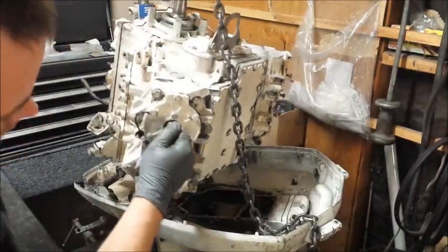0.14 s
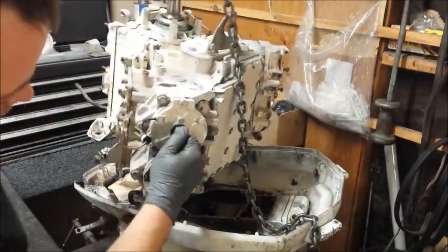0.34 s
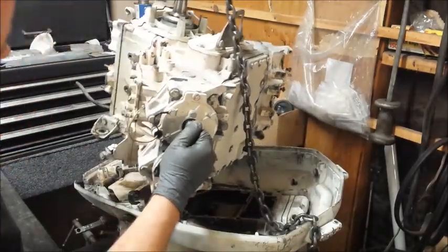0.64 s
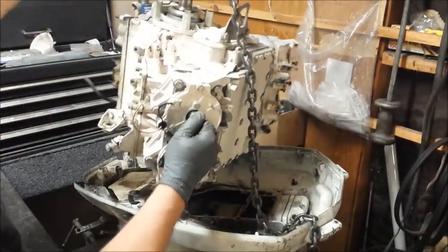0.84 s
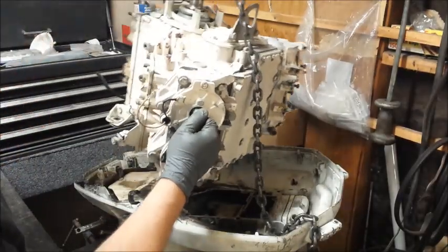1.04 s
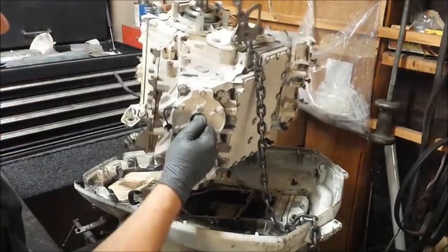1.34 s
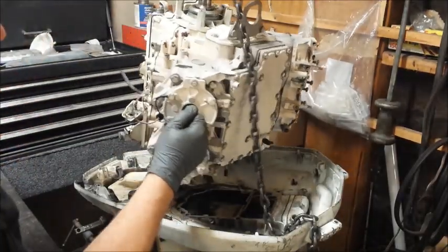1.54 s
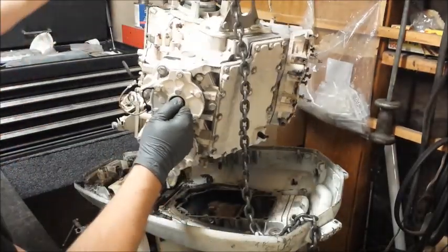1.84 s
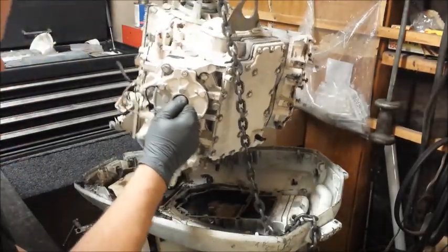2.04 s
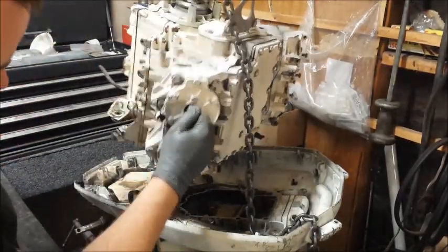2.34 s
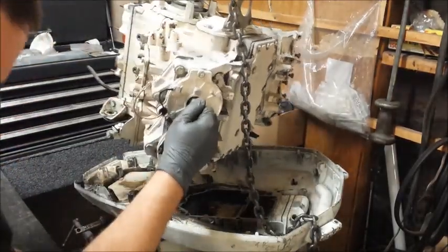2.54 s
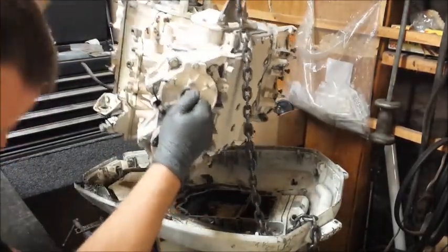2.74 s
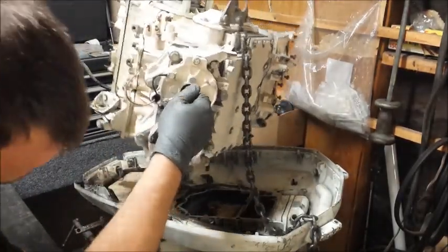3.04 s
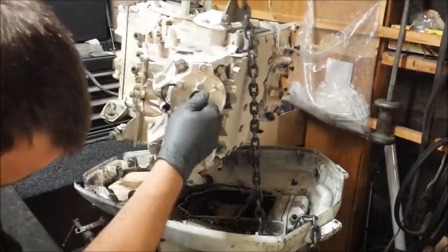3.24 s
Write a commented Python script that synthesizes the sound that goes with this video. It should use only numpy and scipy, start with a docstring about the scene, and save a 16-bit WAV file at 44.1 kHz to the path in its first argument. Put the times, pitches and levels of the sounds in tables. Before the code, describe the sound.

A chain hoist ratchets with irregular metallic clicks, clinking links and low thuds in a garage.

```python
"""Lever chain hoist in a small garage

An engine is lifted at about one stroke a second. Each turn of the lever forces the support into
a low thud. On the pull, impacts excite steel modes: the pawl pings and loaded links snap into place.
On the way back the ratchet rattles more softly. Reflections from the walls add a short tail."""
import sys
import numpy as np
from scipy import signal
from scipy.io import wavfile
from scipy.ndimage import uniform_filter1d

SR = 44100
rng = np.random.default_rng(int(sys.argv[2]) if len(sys.argv) > 2 else 0)


def dump(signal):
    """Clip the signal to [-1, 1] and save it as 16-bit WAV at the path in sys.argv[1]."""
    limited = np.clip(np.atleast_2d(signal).T, -1, 1)
    pcm = np.round(limited * 32767).astype(np.int16)
    wavfile.write(sys.argv[1], SR, pcm)


N = 149940
EVENT_S = .4  # time allowed for one impact

# spectrum of a hard steel contact: frequency_hz, level_db
SNAP_SPECTRUM = [(200, -19.5), (600, -15.5), (1300, -9), (1900, -14.5), (2700, -5.5), (3700, -8), (5400, 3),
                 (7700, -5), (10000, -13), (15500, -13)]
# spectrum of loose steel rattling: frequency_hz, level_db
RATTLE_SPECTRUM = [(200, 2), (600, -5.5), (1500, -5), (2000, -8), (2600, -1), (3800, -2.5), (6000, 0),
                   (8000, -11), (10000, -15), (15500, -17)]


def amp(db):
    """Amplitude ratio of a level in decibels."""
    return 10 ** (np.asarray(db) / 20)


def unit(x):
    """Normalisation to unit energy."""
    return x / np.sqrt(np.sum(x ** 2) + 1e-20)


def read(points, hz):
    """Interpolation on a log-frequency axis."""
    f, value = np.transpose(points)
    return np.interp(np.log(hz + 1), np.log(f + 1), value)


def add(mix, start_s, sound):
    """Superposition of a delayed sound on the mix."""
    part = mix[max(round(start_s * SR), 0):][:len(sound)]
    part += sound[:len(part)]


def colour(x, points, tilt_db=0, size=4096):
    """Minimum-phase filter with the given spectrum, tilted by tilt_db per octave."""
    hz = abs(np.fft.fftfreq(size, 1 / SR))
    octaves = np.log2(np.maximum(hz, points[0][0]) / points[0][0])
    log_gain = np.log(amp(read(points, hz) + tilt_db * octaves))
    taps = np.fft.ifft(np.exp(np.conj(signal.hilbert(log_gain)))).real[:size // 2]
    return signal.fftconvolve(x, taps)[:len(x)]


def ring(modes):
    """Free vibration: a sum of damped modes in random phase."""
    t = np.arange(0, EVENT_S, 1 / SR)
    return sum(amp(db) * np.exp(-np.log(1000) * t / t60) * np.sin(2 * np.pi * (hz * t + rng.random()))
               for hz, db, t60 in modes)


def jangle(low_hz, high_hz, t60, count=40):
    """Inharmonic vibration of loose steel parts: modes scattered in log frequency."""
    draws = rng.random((count, 2))
    return unit(ring([(low_hz * (high_hz / low_hz) ** place, 20 * np.log10(size + 1e-9), t60)
                      for place, size in draws]))


def clash(crack_s, chatter_s, chatter_db, grain_db):
    """Impact noise of steel on steel: a crack and a decaying chatter of tiny contacts."""
    t = np.arange(0, EVENT_S, 1 / SR)
    crack, chatter, sizes = rng.standard_normal((3, len(t)))
    clumps = unit(uniform_filter1d(sizes, size=40)) * np.sqrt(len(t))
    crack = unit(crack * np.exp(-t / crack_s))
    chatter = unit(chatter * amp(grain_db * clumps) * np.exp(-t / chatter_s))
    return unit(crack + amp(chatter_db) * chatter)


def air(level_db=-45):
    """Stationary background noise, strongest in the bass."""
    # garage background: frequency_hz, level_db
    spectrum = [(20, 5), (40, -0.5), (110, 5.5), (300, -1), (700, -5.5), (1200, -11), (2600, -15),
                (3800, -38), (5800, -13), (9000, -27), (15000, -28.5)]
    return amp(level_db) * np.sqrt(N) * unit(colour(rng.standard_normal(N), spectrum))


def garage(x, delay_s=0.0071, build_s=0.0045):
    """Diffuse reverberation: dense reflections, each band decaying at its own rate."""
    # reverberation time: frequency_hz, t60_s
    decay = [(100, 0.39), (500, 1), (1500, 0.5), (3500, 0.4), (6000, 0.33), (10000, 0.22), (15000, 0.39)]
    hz, t, bands = signal.stft(rng.standard_normal(SR), SR, nperseg=256)
    damping = np.exp(-np.log(1000) * t / read(decay, hz)[:, None])
    tail = signal.istft(bands * damping, SR, nperseg=256)[1]
    onset = np.clip((np.arange(len(tail)) / SR - delay_s) / build_s, 0, 1)
    return signal.fftconvolve(x, unit(tail * onset))[:N]


def loose_chain(ticks_per_s=160, level_db=-52):
    """Shot noise: random contacts in the hanging chain merge into a faint rustle."""
    impulses = (rng.random(N) < ticks_per_s / SR) * rng.standard_normal(N)
    tick = colour(jangle(low_hz=889, high_hz=6700, t60=0.044), RATTLE_SPECTRUM)
    return amp(level_db) * np.sqrt(N) * unit(signal.fftconvolve(impulses, tick)[:N])


def jingle():
    """High modes of the free chain, excited in a new balance by every blow."""
    # chain overtones: frequency_hz, level_db, t60_s
    overtones = [(7870, 12, 0.099), (8100, -18, 0.12), (9700, -22, 0.09), (9500, -1, 0.14),
                 (10800, -4, 0.073), (11500, -7, .09), (14400, -19, .1)]
    return unit(ring([(hz * rng.uniform(.985, 1.015), db + 4 * rng.standard_normal(), t60)
                      for hz, db, t60 in overtones]))


def support(attack_s=0.0049, release_s=0.023, sag_db_per_s=25, thump_t60=0.091, wander=0.145):
    """Forced vibration: the overhead support thumps, booms and judders as it takes the load."""
    # lever turns: start_s, length_s, level_db, tilt_db_per_octave, boom_hz, boom_db, thump_db
    shudders = [(0.143, 0.08, -2.5, 1, 106, -3, -4), (0.232, 0.081, -2, -1, 99.3, 0, -17),
                (0.608, 0.024, -3.5, -1, 138, -21, -4), (1.065, 0.017, -9.5, -3.5, 93.6, 0.5, -14),
                (1.143, 0.19, -10.5, -1, 92.2, 0, -10), (1.552, 0.031, -5, 1.5, 236.3, -7, -1),
                (2.055, 0.1, -6.5, 3, 111.5, -3.5, -2.5), (2.142, 0.11, -5.5, 1, 104, -4, -11),
                (2.554, 0.013, -5, -2, 148, -7, -1.5), (2.583, 0.012, -11, 0, 140.3, -9, 6.5),
                (3.037, 0.092, -5.5, 2.5, 100, 0, -4), (3.243, 0.0045, -10, -4, 105, -4, -0.5)]
    # support resonances: frequency_hz, level_db, t60_s
    modes = [(96.7, 1, 0.72), (138, -14, 0.17), (145.7, -5, 0.3), (191, 1, 0.13), (224.7, -16, 0.85),
             (298.6, -0.5, 0.3), (393, -3, 0.128), (446, -11.5, 0.36)]
    # broadband response of the support: frequency_hz, level_db
    spectrum = [(30, -7), (65, -40), (95, -4.5), (115, -3), (150, 4), (180, -5.5), (255, -4), (330, -17.5),
                (550, -26), (1200, -22.5), (4000, -49.5)]
    out, t = np.zeros(N), np.arange(0, EVENT_S, 1 / SR)
    onset = np.minimum(t / attack_s, 1)
    for start_s, length_s, db, tilt_db, boom_hz, boom_db, thump_db in shudders:
        push = onset * amp(-sag_db_per_s * t) * np.exp(-np.maximum(t - length_s, 0) / release_s)
        force = unit(push * rng.standard_normal(len(t)))
        tilted = [(hz, level + tilt_db * np.log2(hz / modes[0][0]), t60) for hz, level, t60 in modes]
        resonance = unit(signal.fftconvolve(force, unit(ring(tilted)))[:len(t)])
        judder = unit(unit(colour(force, spectrum, tilt_db)) + amp(-6) * resonance)
        drift = unit(uniform_filter1d(rng.standard_normal(len(t)), size=600)) * np.sqrt(len(t))
        phase = 2 * np.pi * np.cumsum(boom_hz * (1 + wander * drift)) / SR
        boom = unit(push * (np.sin(phase) + amp(-6) * np.sin(2 * phase)))
        thump = unit(onset * np.exp(-np.log(1000) * t / thump_t60) * np.sin(2 * np.pi * boom_hz * t))
        gain = amp(db - 31.5) * np.sqrt((length_s + release_s) * SR)  # energy grows with duration
        add(out, start_s, gain * (unit(judder + amp(boom_db) * boom) + amp(thump_db) * thump))
    return out


def housing(spread=1.4):
    """Body resonance: the hoist housing rings with a hollow clank under two ratchet clicks."""
    # housing clanks: start_s, level_db, centre_hz
    clanks = [(1.833, -1.5, 1382), (2.832, -5.5, 956)]
    out = np.zeros(N)
    for start_s, db, hz in clanks:
        add(out, start_s, amp(db) * jangle(hz / spread, hz * spread, t60=0.14, count=16))
    return out


def slack(attack_s=0.0016):
    """Backlash: the play in lever and chain closes with small, dull knocks."""
    # muffled contacts: start_s, level_db, centre_hz
    knocks = [(.133, 2.5, 2600), (0.145, -10, 1300), (0.172, -1, 1980), (.2, -3.5, 1270),
              (2.0476, -0.5, 6100), (2.059, -1.5, 1430), (2.0926, 1, 6150), (2.405, -4, 2290),
              (2.546, 3.5, 2290), (3.027, 0, 5700), (3.075, -5.5, 6540), (3.167, -11, 5670),
              (3.294, -4, 4660), (3.359, -9.5, 5700)]
    # spectrum of a knock: ratio_to_centre, level_db
    shape = [(.1, -8.5), (.55, -5.5), (1, 1), (1.3, -10), (2.2, -18.5), (6, -37)]
    out = np.zeros(N)
    for start_s, db, centre_hz in knocks:
        strike = clash(crack_s=.003, chatter_s=.012, chatter_db=0, grain_db=1)
        strike *= np.minimum(np.arange(len(strike)) / SR / attack_s, 1)
        spectrum = [(ratio * centre_hz, level) for ratio, level in shape]
        add(out, start_s, amp(db - 7.5) * unit(colour(strike, spectrum)))
    return out


def ratchet(rebound_s=.008, detune=0.0147):
    """Impact and rebound: the unloaded ratchet skips a tooth, shaking wheel, housing and chain."""
    # teeth on the free swing: start_s, level_db, tilt_db_per_octave, ring_db
    teeth = [(0.0, -7, -1, -12), (0.777, 0.5, 2, -7.5), (.849, -3, 0.5, -8.5), (0.9077, 0.5, 2, -8.5),
             (.998, -0.5, 2, -18), (1.728, 1, 2.5, -10.5), (1.786, -2, 4, -7), (1.83, 0, 2, -12),
             (1.893, -3.5, 2.5, -2.5), (2.706, -1, 1.5, -3), (2.767, -1, 1.5, -25), (2.82, -5.5, -0.5, 0),
             (2.87, -8.5, 3.5, -22)]
    # ratchet wheel resonances: frequency_hz, level_db, t60_s
    modes = [(1455, -20, 0.49), (1735, -18.5, 0.22), (2391, -7.5, 0.12), (2520, -3.5, 0.089),
             (3454, -11, 0.095), (4350, -23, 0.15)]
    out = np.zeros(N)
    for start_s, db, tilt_db, ring_db in teeth:
        strike = clash(crack_s=0.0015, chatter_s=0.025, chatter_db=15.5, grain_db=-0.5)
        strike += amp(-5.5) * jangle(low_hz=699.2, high_hz=7695, t60=0.25, count=46)
        add(strike, rebound_s, amp(-8) * jangle(low_hz=2014, high_hz=14830, t60=0.046, count=30))
        rattle = unit(colour(strike, RATTLE_SPECTRUM, tilt_db))
        wheel = unit(ring([(hz * (1 + detune * rng.standard_normal()),
                            level + 2 * rng.standard_normal(), t60) for hz, level, t60 in modes]))
        add(out, start_s, amp(db + 5) * (rattle + amp(ring_db) * wheel + amp(-14) * jingle()))
    return out


def pawl(bright_db=2, bright_t60=0.064, vary_db=3):
    """Modal excitation: where the pawl lands on a tooth decides which modes ring most."""
    # pawl strikes: start_s, level_db, low_ring_db, tick_db, bright_hz
    pings = [(0.289, -11, 0, -20, 6070), (.408, -13.5, 1, -1.5, 5760), (0.477, -20.5, -10, -8, 5030),
             (0.5989, -23, -5.5, -21, 5755), (0.602, -7.5, -13.5, -11.5, 5110), (0.858, -14, -8, 6, 5300),
             (1.1572, -5, -5, -17, 5755), (1.682, -5.5, -3, -9, 5810), (1.812, -5.5, -14, -14, 6140),
             (2.136, -21, -5, -1, 4750), (2.256, -4.5, -29, -26, 5770), (3.187, -7.5, -6.5, -17, 6050)]
    # lower and upper pawl resonances: frequency_hz, level_db, t60_s
    low_modes = [(1160, -4.5, 0.056), (2705, 1.5, 0.031), (2820, 8, 0.044), (2945, -20, 0.055)]
    high_modes = [(4770, -2, 0.06), (5094, -0.5, 0.077), (5530, -1, 0.12), (5854, 2.5, 0.07),
                  (6000, 6.5, 0.034), (6700, 1, 0.012)]
    # contact of pawl and tooth: frequency_hz, level_db
    spectrum = [(300, -54), (1150, 7), (1800, -40), (2800, 5), (3600, -13), (4700, 8), (5800, 9.5),
                (7000, 0.5), (9000, -12.5), (15500, -39)]
    out = np.zeros(N)
    for start_s, db, low_db, tick_db, bright_hz in pings:
        high = [(hz, level + vary_db * rng.standard_normal(), t60) for hz, level, t60 in high_modes]
        ringing = ring(high + [(bright_hz, bright_db, bright_t60)]) + amp(low_db) * ring(low_modes)
        contact = clash(crack_s=0.004, chatter_s=0.011, chatter_db=10, grain_db=-1)
        contact = amp(8.5) * unit(colour(contact, spectrum))
        tick = clash(crack_s=0.00027, chatter_s=0.017, chatter_db=7, grain_db=1.5)
        tick = amp(11 + tick_db) * unit(colour(tick, SNAP_SPECTRUM))
        add(out, start_s, amp(db) * (amp(-15.5) * ringing + contact + tick))
    return out


def links(ring_t60=.08):
    """Impact under tension: a link snaps into its pocket, bounces once and shakes its neighbours."""
    # links seating: start_s, level_db, tilt_db_per_octave, pitch_hz, ring_db, bounce_s, clack_db
    snaps = [(.303, 0.5, -2, 2800, -15, .005, -6), (0.3663, -10, -3, 5960, 4, .002, -27),
             (.395, -3, -2.5, 2785, -3, .007, -4.5), (0.511, -3.5, -0.5, 7640, -7, 0.0059, 0),
             (1.2444, 0.5, 0.5, 5300, -3, .004, -9), (1.325, 0, -3, 5260, -15, 0.0032, -9.5),
             (1.44, -3.5, -1.5, 2420, -36, 0.0074, -1), (2.208, 1, -1.5, 5040, -36, 0.0044, -9),
             (2.3065, 0.5, -0.5, 7930, -7, .004, -2.5), (2.432, -2.5, -1, 2817, -4.5, 0.0077, -6.5),
             (2.8124, 0, -2, 5050, -6, 0.0079, -28), (3.192, -1, -2.5, 5970, -9, .007, -3.5)]
    # hard clack of a link: frequency_hz, level_db
    spectrum = [(400, -20), (1200, -24.5), (2300, 2.5), (3000, 1), (3800, -14), (6000, -4), (12000, -19.5)]
    out = np.zeros(N)
    for start_s, db, tilt_db, hz, ring_db, bounce_s, clack_db in snaps:
        strike = clash(crack_s=0.00064, chatter_s=0.024, chatter_db=14, grain_db=-1.5)
        strike += amp(-6) * jangle(low_hz=1101.2, high_hz=14300, t60=0.04, count=28)
        bounce = clash(crack_s=0.0005, chatter_s=0.0062, chatter_db=8.5, grain_db=4)
        add(strike, bounce_s, amp(-6) * bounce)
        snap = unit(colour(strike, SNAP_SPECTRUM, tilt_db))
        clack = clash(crack_s=.0011, chatter_s=.007, chatter_db=-6, grain_db=2)
        clack = amp(clack_db) * unit(colour(clack, spectrum))
        tone = amp(ring_db) * unit(ring([(hz, 0, ring_t60)]))
        add(out, start_s, amp(db + 7) * (snap + clack + tone + amp(-14) * jingle()))
    return out


def scene():
    """Superposition of direct sound, reverberation and background."""
    steel = pawl() + links() + ratchet() + slack() + housing() + loose_chain()
    thuds = support()
    return (steel + amp(-9.5) * garage(steel) + thuds + amp(-7.5) * garage(thuds) + air())[None]


def record(dry):
    """Linear filtering: the microphone's frequency response, then a steep low-pass."""
    # microphone response: frequency_hz, gain_db
    response = [(20, 2), (7000, 0), (9500, -1), (9950, -4), (10700, -3.5), (15500, -7)]
    low_pass = signal.firwin(511, cutoff=15600, window=("kaiser", 8), fs=SR)
    return signal.fftconvolve(colour(dry[0], response), low_pass, "same")[None]


dry = scene()
out = record(dry)
dump(out)
```